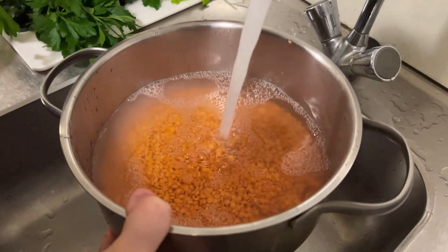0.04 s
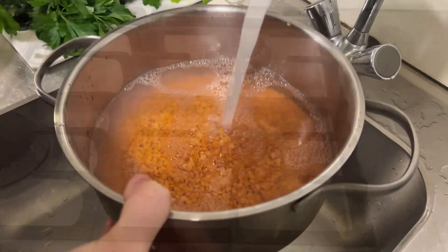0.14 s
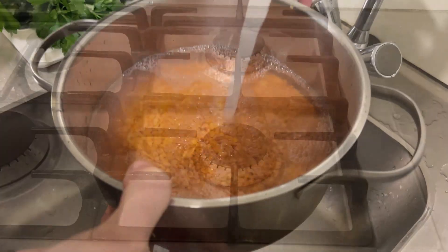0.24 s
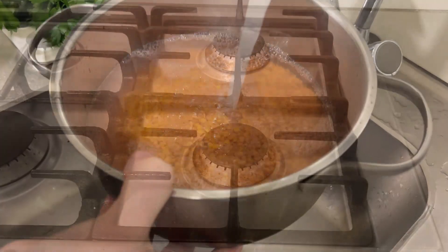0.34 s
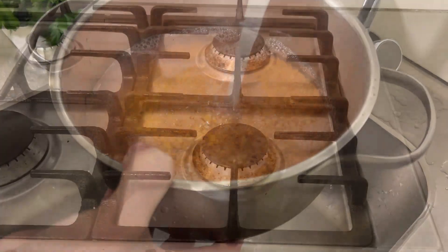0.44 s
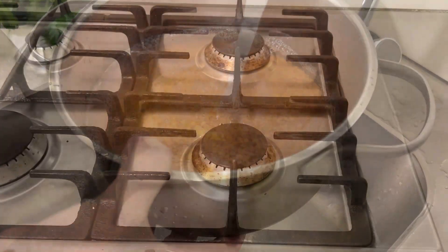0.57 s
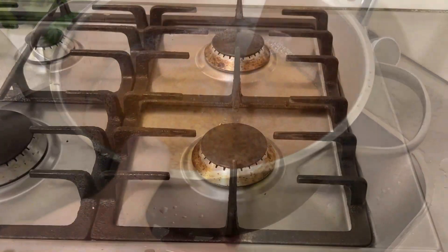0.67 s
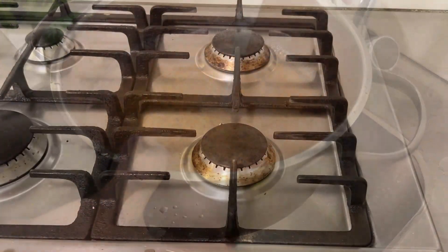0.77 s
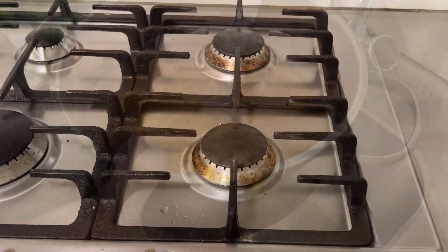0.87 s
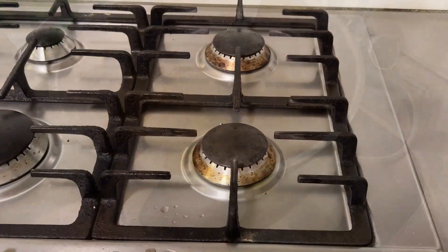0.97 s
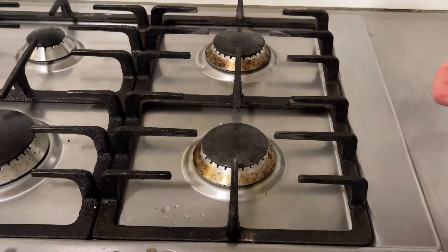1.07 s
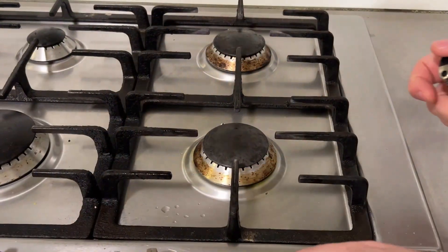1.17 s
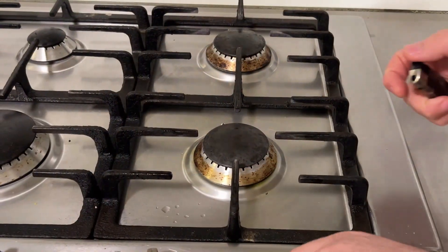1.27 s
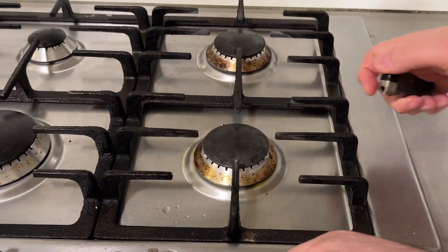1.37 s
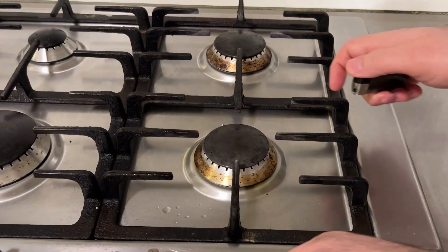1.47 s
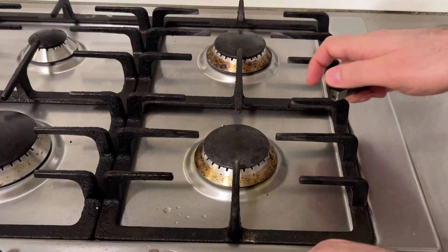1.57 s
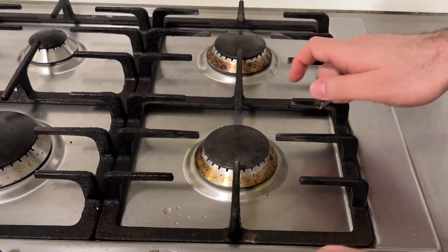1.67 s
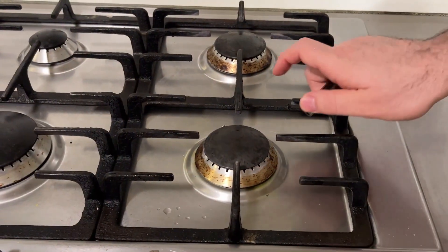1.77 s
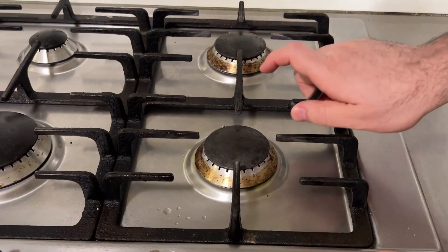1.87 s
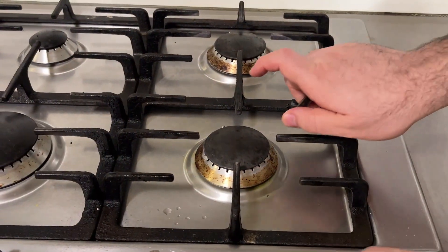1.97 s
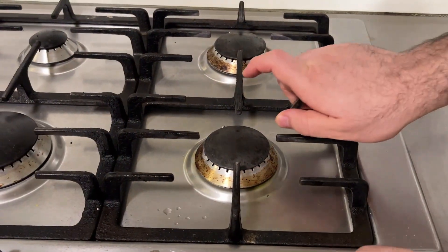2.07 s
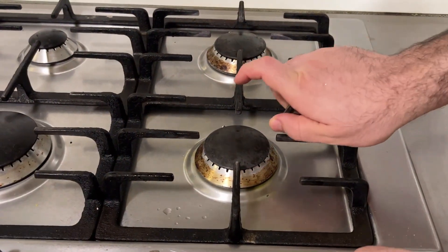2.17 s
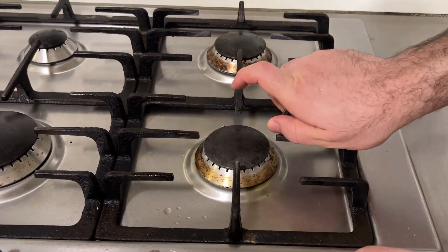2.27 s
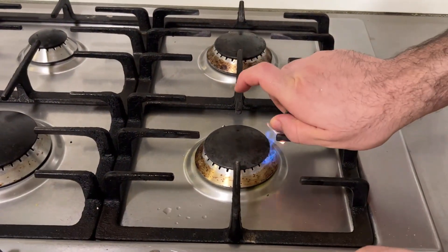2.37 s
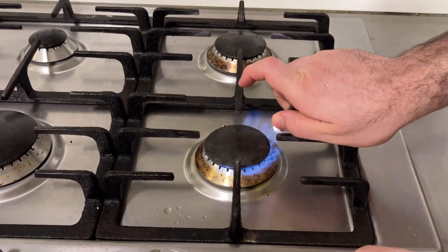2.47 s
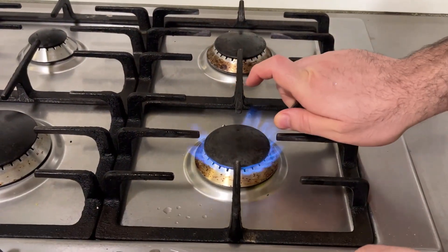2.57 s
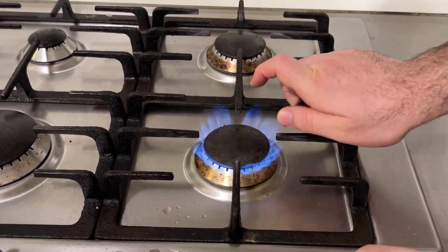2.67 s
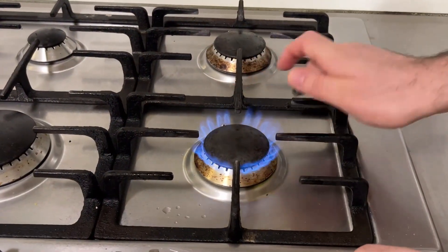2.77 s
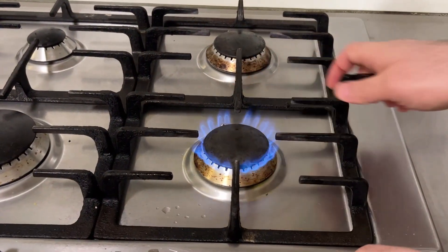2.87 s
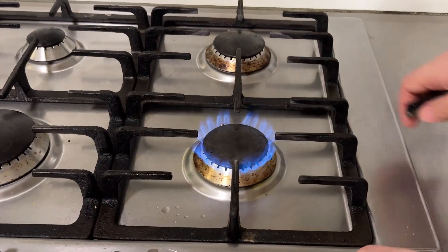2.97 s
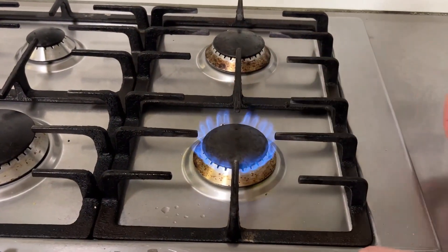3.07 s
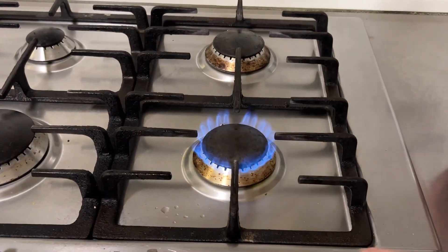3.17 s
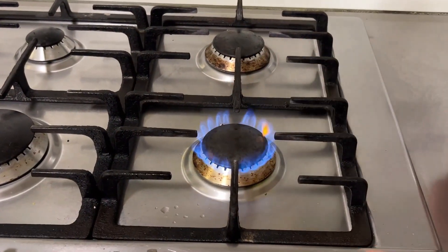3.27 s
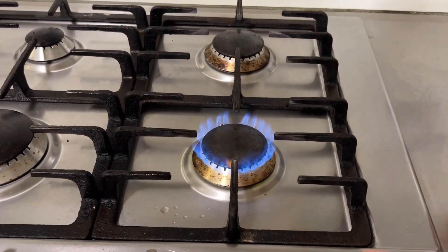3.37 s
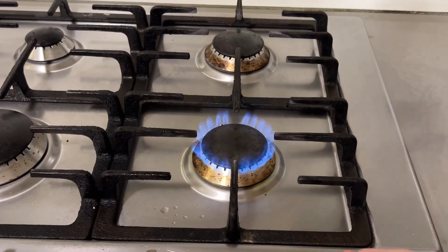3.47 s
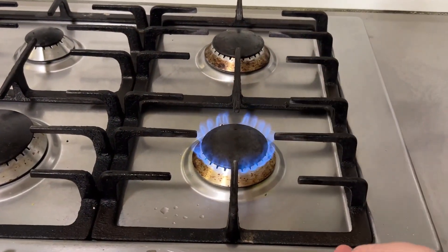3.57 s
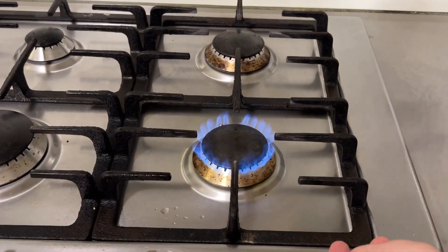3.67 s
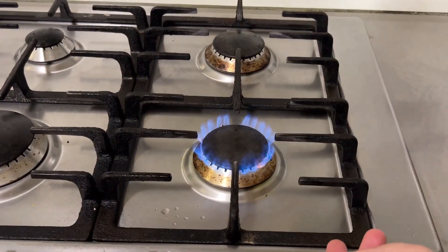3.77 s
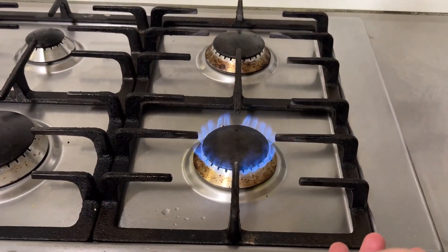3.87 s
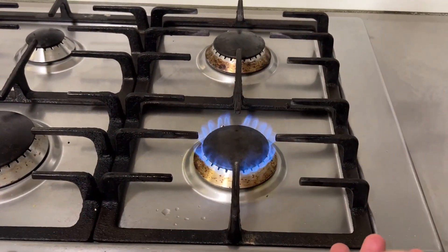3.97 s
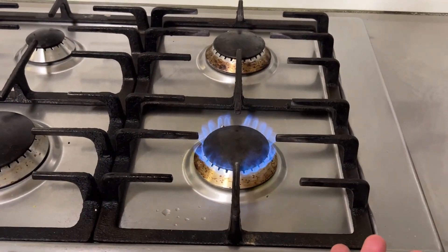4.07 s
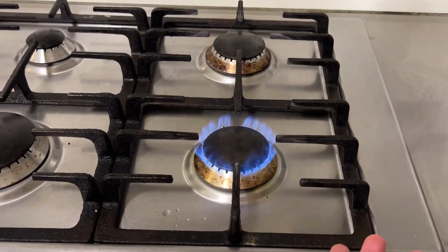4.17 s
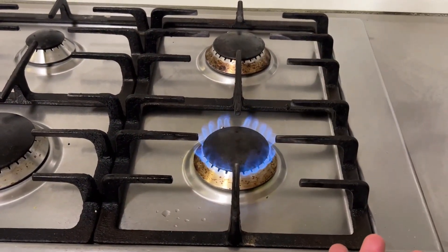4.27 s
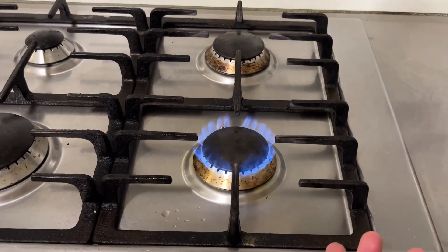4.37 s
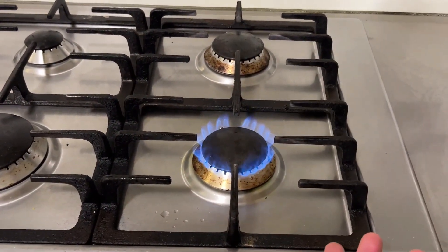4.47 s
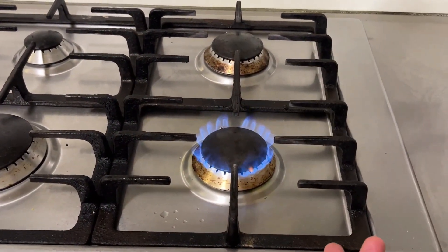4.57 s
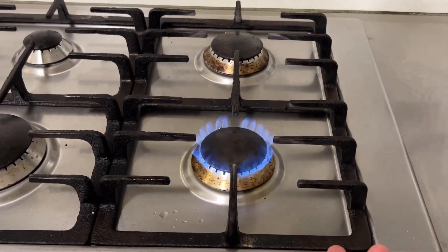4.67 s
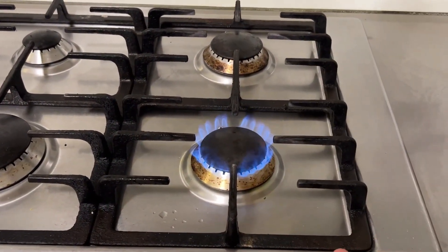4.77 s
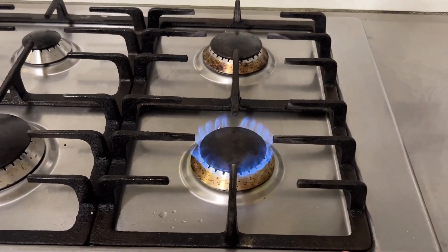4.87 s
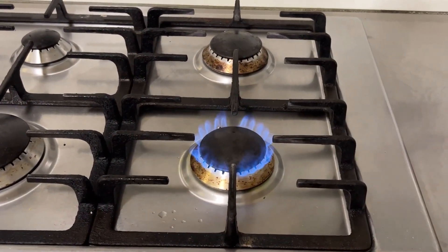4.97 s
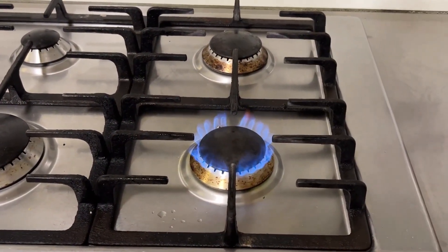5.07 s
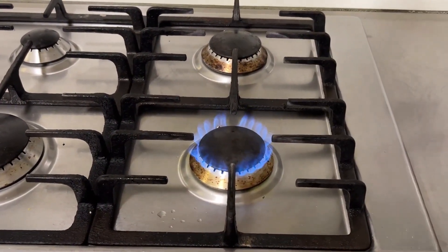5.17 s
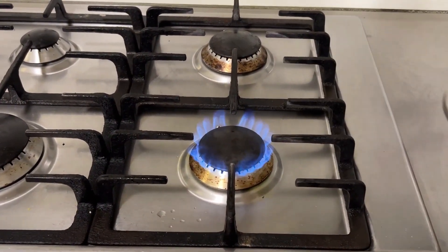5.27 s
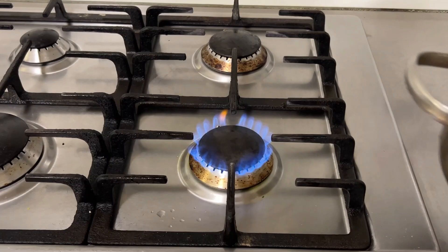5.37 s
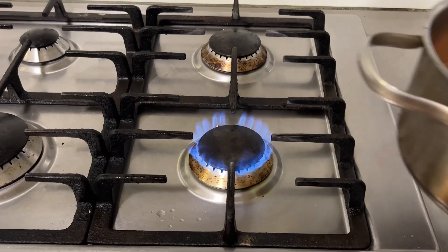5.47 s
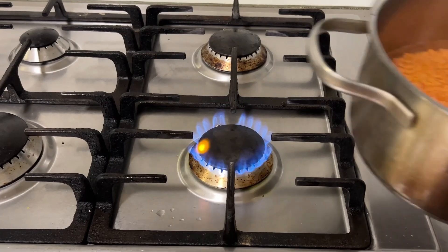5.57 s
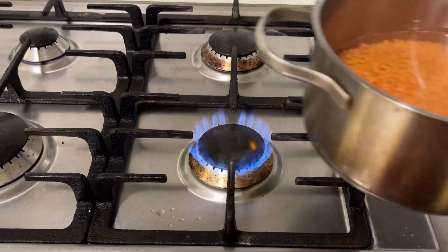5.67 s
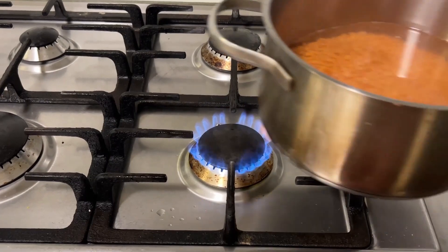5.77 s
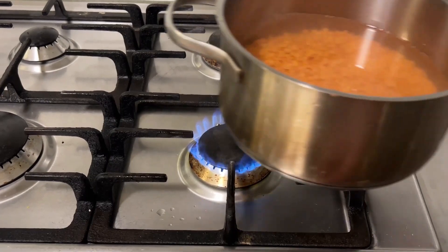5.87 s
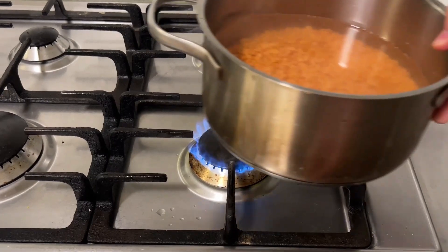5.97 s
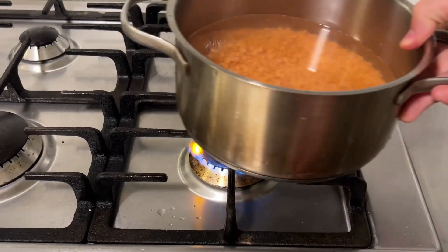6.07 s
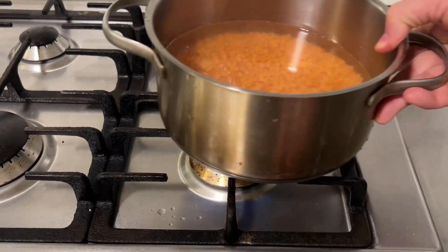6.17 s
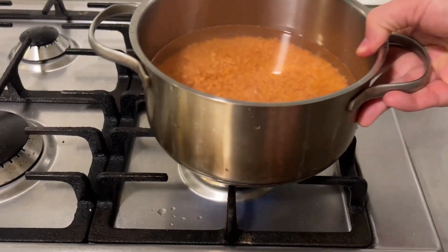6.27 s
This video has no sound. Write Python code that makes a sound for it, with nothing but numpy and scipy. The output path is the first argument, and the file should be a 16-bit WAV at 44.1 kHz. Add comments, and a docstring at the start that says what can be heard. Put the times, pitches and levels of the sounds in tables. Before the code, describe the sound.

A foamy stream of tap water pours into a metal pot from the start, with a broad hiss, fine splashes and a few low gurgles in the first 0.4 seconds; it fades and is gone by 0.9. A cooker hood runs throughout, an airy rush with a low hum and thin wavering tones, rising slightly as the water leaves. At about 1.7 a thin, high gas hiss starts and stays. At 2.2 a lighter snaps, hard and bright, echoing off the kitchen walls, and the flame catches at once with a soft low whoosh, settling by 2.8 into a quiet burn. A faint trigger tick comes near 2.5. At 3.16 the lighter drops on the worktop: high chink, clack, quick bounce, lingering steel ring. Only hiss and hood continue, gently swelling, until a filled steel pot knocks the iron grate at 6.3, short and dull-bright, right before the end.

```python
"""A tap fills a pot with a watery hiss and small gurgles, then fades away under a steady cooker hood.
Gas is opened and hisses as a jet through a tube; a lighter snaps, made of short cracks and ringing metal.
The burner catches with a soft whoosh of low noise, then burns on quietly, and the trigger flicks back.
The lighter is dropped on the worktop, chinks, clacks and sets a steel tray ringing.
At the last moment a steel pot meets the iron grate. The room echoes the knocks; the hood runs throughout."""
import sys
import numpy as np
from scipy import signal
from scipy.fft import rfft, irfft, next_fast_len
from scipy.io import wavfile

SR = 44100
rng = np.random.default_rng(int(sys.argv[2]) if len(sys.argv) > 2 else 0)


def unload_wav(signal):
    """Save mono or channel-first audio to the path in sys.argv[1] as 16-bit WAV at rate SR, clipped to [-1, 1]."""
    wavfile.write(
        sys.argv[1],
        SR,
        np.round(np.clip(np.atleast_2d(signal).T, -1, 1) * 32767).astype(np.int16),
    )


N = 279373
TIME, FREQS = np.arange(N) / SR, np.fft.rfftfreq(N, 1 / SR)

# Gas leaving the injector: (frequency [Hz], level [dB])
GAS_JET = [(300, -100), (1500, -100), (3000, -91.5), (5500, -99), (7500, -107), (10000, -102),
           (11000, -103), (12900, -109), (14000, -104), (16000, -107)]
# Resonances of the burner's mixing tube: (frequency [Hz], width [Hz], lift [dB])
MIXING_TUBE = [(1600, 160, 5), (2310, 130, 8), (3330, 90, 7), (3450, 130, 10), (4300, 500, -3),
               (4980, 220, 10.5), (5430, 170, 6.5), (6500, 190, 11), (8650, 170, 7), (9780, 450, 4),
               (11620, 300, 10), (15060, 300, 15)]
# Slow swelling and ebbing of the hiss: (time [s], level [dB])
HISS_LEVEL = [(1.9, -1.5), (2.9, 1.6), (3.9, -0.5), (4.4, -2), (5.1, 1.6), (5.6, 1), (6.1, -1.2)]
# The flame's soft roar: (frequency [Hz], level [dB])
FLAME_ROAR = [(20, -80), (60, -62.5), (100, -57), (180, -63.5), (400, -78), (1200, -90), (4000, -115)]
# The gas valve opens once and stays open
GAS_ON_S, VALVE_TURN_S, GAS_DB = 1.72, .07, -1.5
# The flame catches, stays full while fire runs round the ring, then dies back to a steady burn
IGNITION_S, CATCH_S, SPREAD_S, SETTLE_S = 2.22, 0.036, 0.33, 0.15
WHOOSH_DB, STEADY_FLAME_DB = -5.5, -20

# In the tables below, t60 is the time a sound takes to die away by 60 dB.
# The lighter's striker, its rebound and the spring's shiver:
# (time [s], crack level [dB], crack t60 [s], ring level [dB])
LIGHTER_SNAPS = [(2.2244, -7, .0045, -25), (2.2258, -14, .008, -38), (2.2287, -26, .02, -43)]
# Tone colour of the snap: (frequency [Hz], level [dB])
SNAP_TONE = [(200, -30), (900, -13), (1200, -6), (1650, 6), (2400, 2), (2950, -1), (3500, 1.5), (4500, 1),
             (5600, -1), (7400, 5), (8300, -1.5), (10400, 10), (12000, 1), (13300, -6), (15000, 8.5),
             (16500, -8)]
# Ringing of the lighter's case and barrel:
# (frequency [Hz], level when snapped [dB], level when dropped [dB], t60 [s])
LIGHTER_BODY = [(1530, -11, -5, .03), (1680, 0, -9, .04), (2260, -3, -8, .035), (2720, -6, 2, .03),
                (3050, -14, -7, .025), (3420, -4, -12, .035), (3900, -7, -3, .03), (4310, -1, -3, .03),
                (4640, -4, -4, .035), (4950, -3, -7, .035), (5880, -7, -7, .025), (6560, -3, -9, .03),
                (7720, -1, -9, .025), (8480, 3, -8, .025)]
# The snap comes back off the hob, the wall behind it and the hood: (delay [s], level [dB])
FIRST_ECHOES = [(.0078, -19), (.0104, -18), (.0127, -19), (.0166, -17)]
# The trigger flicking back: (time [s], crack level [dB], crack t60 [s], ring level [dB])
TRIGGER_RELEASES = [(2.4598, -31.5, .02, -46)]
# Tone colour of the trigger: (frequency [Hz], level [dB])
TRIGGER_TONE = [(500, -18), (2000, -1), (2950, 2), (3800, -5), (4300, 10), (4700, 12), (5700, -3),
                (6800, 3), (9000, -2), (16000, -5)]
# Ringing of the trigger's spring: (frequency [Hz], level [dB], t60 [s])
TRIGGER_SPRING = [(2400, -9, .04), (3250, -9, .04), (4330, -1, .06), (4580, 0, .08), (4720, -3, .09),
                  (4950, -3, .07), (6700, -5, .05)]
# The lighter landing and rattling: (time [s], crack level [dB], crack t60 [s], ring level [dB])
LIGHTER_DROPS = [(3.1587, -19, .008, -42), (3.1614, -5.3, .009, -22), (3.1740, -23.5, .018, -39),
                 (3.1812, -9, .006, -33)]
# Tone colour of the landing: (frequency [Hz], level [dB])
DROP_TONE = [(100, -23), (270, -18), (450, 7), (800, -7), (1500, 3.5), (2200, 2.5), (2800, 1.5),
             (3300, 0.5), (4200, 0), (6000, -2.5), (7300, -0.5), (8500, -0.5), (11000, 3.5), (13000, -3),
             (15000, 0.5), (16500, -19)]
# The lighter's metal tip chinking as it lands: (time [s], crack level [dB], crack t60 [s])
TIP_CHINKS = [(3.1583, -7, 0.013), (3.1610, -16, .008), (3.1740, -28, .012), (3.1811, -21, .008),
              (3.2190, -33, .015), (3.2945, -39, .025)]
# Tone colour of the metal tip: (frequency [Hz], level [dB])
TIP_TONE = [(500, -46), (7000, -33), (9400, -5), (11100, 17), (12300, -13), (16000, -20)]
# Ringing of the worktop and the hob's steel tray: (frequency [Hz], level [dB], t60 [s])
TRAY_MODES = [(343, 1, .5), (390, 0, .4), (465, 6, .08), (540, 4, .35), (1640, -5, .35), (2285, -6, .5),
              (2645, -3, .75), (2741, -1, .7), (3085, -10, .5), (3693, -5, .55), (3876, -7, .4),
              (3935, -5, .35), (4069, -9, .65), (4557, -9, .7), (4644, -9, .65), (4764, -8, .5),
              (5216, -10, .7), (6589, -14, .6), (7074, -10, .5), (8012, -10, .6), (8241, -9, .55),
              (8685, -12, .6)]
TRAY_DB = -39  # added to every level in the table above

# The pot meeting the grate: (time [s], crack level [dB], crack t60 [s], ring level [dB])
POT_CLUNKS = [(6.3283, -12, .03, -14)]
# Tone colour of the pot's knock: (frequency [Hz], level [dB])
POT_TONE = [(100, -17), (700, -9), (1200, -4), (1550, 6.5), (2100, -3), (3400, -13), (4500, -14),
            (7000, -6), (10000, -16), (16000, -24)]
# Ringing of the filled pot's base: (frequency [Hz], level [dB], t60 [s])
POT_BASE = [(1320, -8, .08), (1530, 0, .08), (1700, -3, .08), (2600, -11, .06), (3400, -3, .06),
            (5700, -11, .04)]

# The foamy jet plunging into the pot: (frequency [Hz], level [dB])
WATER_JET = [(30, -80), (160, -56), (300, -76), (800, -64.5), (1200, -63.5), (1350, -71.5), (2200, -72.5),
             (3400, -77.5), (6000, -79), (9000, -79.5), (10400, -75), (12000, -80), (14300, -83),
             (15600, -84)]
# Ringing of the pot and the air above the water: (frequency [Hz], width [Hz], lift [dB])
POT_BOWL = [(780, 50, 3.5), (1100, 5.1, 14), (2320, 120, 6), (3080, 110, 3), (4100, 130, 5), (4300, 160, 1)]
# Air pockets throbbing under the jet: (time [s], level [dB])
AIR_POCKETS = [(.068, -35), (.168, -36), (0.225, -36), (.260, -33), (.335, -42), (.362, -37)]
# The tap holds, fades evenly, and is cut off before the fade is through
TAP_DB, TAP_HOLD_S, TAP_FADE_S = -6.5, 0.12, .93
TAP_STOP_S, TAP_CUT_S = 0.875, .025
# Typical starting pitch of a gurgle, its dying time, and its pitch rise as a share per second
GURGLE_HZ, GURGLE_T60_S, GURGLE_RISE_PER_S = 140, 0.11, 2.5

# Air rushing through the hood: (frequency [Hz], level [dB])
HOOD_RUSH = [(20, -93), (55, -72.5), (85, -70.5), (125, -65.5), (170, -66.5), (300, -68.5), (600, -70),
             (1240, -72), (1340, -76.5), (2100, -81.5), (3100, -88), (4200, -92.5), (7000, -100),
             (11500, -120), (16000, -140)]
# Resonances of the hood's casing and duct: (frequency [Hz], width [Hz], lift [dB])
HOOD_DUCT = [(123, 18, 5.5), (275, 45, 4), (360, 16, -4), (441, 32, 4), (815, 40, 1.5), (890, 40, -2.5),
             (1025, 50, 3.5), (1120, 30, -3), (1200, 45, 3.5), (1228, 6, 3), (1420, 70, -2), (1510, 60, 4),
             (1690, 90, 2.8), (1870, 100, -2), (2305, 80, 4), (3000, 70, 2), (3680, 120, 2)]
# Tones of the hood's motor and fan blades: (frequency [Hz], level [dB], left minus right [dB],
# loudest time [s], drop far from that time [dB])
HOOD_TONES = [(100, -57, 0, 4.5, 3), (122, -54, 0, 4.8, 2), (200, -52.5, -5, 2.8, 2), (339, -60.5, 0, 3, 0),
              (865, -54.5, 0, 1.7, 8), (1091, -51.5, 2, 3.9, 11), (1099, -53, 2, 1, 12),
              (1143.5, -52, 0, 4.2, 5), (1150, -50.5, 0, 2.3, 17), (1228, -52.5, 2, 5.7, 9)]
HUM_SWELL_S = 1.33  # how slowly each tone swells and ebbs
# The fan's speed drifts by this share, and each tone's level sways in the moving air
FAN_DRIFT, HUM_SWAY_DB = .0004, 1
# The hood is fainter at first, then comes up to full strength
HOOD_START_DB, HOOD_RISE_AT_S, HOOD_RISE_S = -4.5, 0.59, 0.42

# Scatter off nearby surfaces, with little of the highest treble: (frequency [Hz], level [dB])
NEARBY_SURFACES = [(200, 13), (2000, 9.5), (7000, 15), (10000, -3), (15000, -23)]
# The kitchen's echo: (frequency [Hz], t60 [s], level against the direct sound [dB])
KITCHEN_ECHO = [(200, 0.75, 3), (1500, 0.89, -1.5), (3920, 0.98, 1.5), (7100, 0.8, 0.5), (8150, 0.69, -1),
                (9200, 0.68, -3.5), (11400, 0.58, -6.5), (14500, 0.52, -14)]
# How alike noise is on both sides: (frequency [Hz], likeness [1 = the same, 0 = unrelated])
SIDE_LIKENESS = [(30, 1), (70, 1), (150, 0.95), (300, 0.83), (640, 0.1), (1400, 0.26), (1800, -0.22),
                 (2400, 0.016), (8000, 0.046)]
# Balance of the two sides: (frequency [Hz], left minus right [dB])
SIDE_BALANCE = [(100, 0.5), (350, -1.5), (700, 1), (1600, 2.5), (2300, -2), (3500, 2.5), (4300, 4),
                (5200, 10.5), (6500, 9), (7500, 7), (8300, 2.5)]
# How far the left lags in the shared treble: (frequency [Hz], lag [turns])
LEFT_LAG = [(8300, 0), (10150, .5), (12100, 1), (13850, 1.5), (15400, 2)]
# The upper frequency limit, and the amplitude at which peaks are rounded off
EDGE_HZ, CEILING = 16100, .58


def amp(db):
    """Turns decibels into a gain."""
    return 10 ** (np.asarray(db) / 20)


def read(points, hz, axis=1):
    """Reads a column of a table, joined by straight lines over log frequency."""
    table = np.transpose(points)
    return np.interp(np.log(hz + 1), np.log(table[0] + 1), table[axis])


def ramp(start_s, length_s):
    """Rises evenly from 0 to 1, then stays there."""
    return np.clip((TIME - start_s) / length_s, 0, 1)


def add(mix, s, sound):
    """Lays a stereo sound into the mix at time s, cutting off what runs past the end."""
    part = mix[:, round(s * SR):][:, :sound.shape[1]]
    part += sound[:, :part.shape[1]]


def peaks(modes, hz):
    """Gives the lift or dip in dB that a set of resonances makes."""
    power = sum((amp(db) ** 2 - 1) / (1 + (2 * (hz - f) / width) ** 2) for f, width, db in modes)
    return 10 * np.log10(1 + power.clip(-.9))


def rush(spectrum, modes=()):
    """Turbulent noise on both sides: swirling air or water, mostly alike in the bass."""
    size = next_fast_len(N)
    hz = np.fft.rfftfreq(size, 1 / SR)
    left, other = rfft(rng.standard_normal((2, size)))
    same = np.clip(read(SIDE_LIKENESS, hz), -1, 1)
    right = same * left + np.sqrt(1 - same ** 2) * other
    db = read(spectrum, hz) + (peaks(modes, hz) if modes else 0)
    return irfft(np.array([left, right]) * amp(db), size)[:, :N] * np.sqrt(SR / 2)


def wander(rate_hz):
    """A slow random curve with a typical size of 1, moving mostly below the given rate."""
    slow = irfft(rfft(rng.standard_normal(N)) / (1 + (FREQS / rate_hz) ** 4), N)
    return slow / slow.std()


def flutter(rate_hz, depth_db):
    """A gain that wanders at random."""
    return amp(depth_db * wander(rate_hz))


def tint(x, colour, size=2048):
    """Colours a sound with a filter of unit energy that never answers ahead of its input."""
    log_gain = np.log(amp(read(colour, abs(np.fft.fftfreq(size, 1 / SR)))))
    taps = np.fft.ifft(np.exp(np.conj(signal.hilbert(log_gain)))).real
    return signal.fftconvolve(x, taps[None] / np.linalg.norm(taps), axes=1)


def knock(db, t60, colour, scatter_db=-20, scatter_t60=0.14, size=8192):
    """A hard contact: a dense, dying crack plus a duller scatter off the nearby steel."""
    t = np.arange(size) / SR
    crack = rng.choice([-1, 1], (2, size)) * amp(-60 * t / t60)
    scatter = tint(rng.standard_normal((2, size)), NEARBY_SURFACES)[:, :size]
    scatter *= amp(scatter_db - 60 * t / scatter_t60)
    return amp(db) * tint(crack + scatter, colour)


def ring(modes):
    """Dying tones of a struck body; higher tones can differ more in phase between the sides."""
    out = np.zeros((2, SR))
    lags = rng.uniform(-1, 1, (len(modes), 2, 1)) * 3 / SR  # up to three samples either way
    for (hz, db, t60), lag in zip(modes, lags):
        t = TIME[:round(t60 * SR)]
        add(out, 0, amp(db - 60 * t / t60) * np.sin(2 * np.pi * hz * (t + lag)))
    return out


def blows(rows, colour, modes):
    """All the contacts of one object: each cracks and rings the body."""
    out = np.zeros((2, N))
    for s, db, t60, ring_db in rows:
        add(out, s, knock(db, t60, colour))
        add(out, s, amp(ring_db) * ring(modes))
    return out


def burner():
    """Gas hisses through the mixing tube; once lit, the flame flares, settles and flutters."""
    hiss_db = np.interp(TIME, *np.transpose(HISS_LEVEL))
    flow = amp(GAS_DB) * ramp(GAS_ON_S, VALVE_TURN_S) * amp(hiss_db)
    flare = np.exp(-np.maximum(TIME - IGNITION_S - SPREAD_S, 0) / SETTLE_S)
    fire = ramp(IGNITION_S, CATCH_S) * (amp(WHOOSH_DB) * flare + amp(STEADY_FLAME_DB))
    flame = rush(FLAME_ROAR) * fire * flutter(14, depth_db=1)
    return rush(GAS_JET, MIXING_TUBE) * flow + flame


def lighter_clicks():
    """The striker's blows ring the lighter's body; the returning trigger rings its spring."""
    snapped = [(hz, db, t60) for hz, db, _, t60 in LIGHTER_BODY]
    snaps = blows(LIGHTER_SNAPS, SNAP_TONE, snapped)
    return snaps + blows(TRIGGER_RELEASES, TRIGGER_TONE, TRIGGER_SPRING)


def over_hob(clicks):
    """Adds the clicks' first reflections, which thicken the moment after the snap."""
    out = clicks.copy()
    for delay_s, db in FIRST_ECHOES:
        add(out, delay_s, amp(db) * clicks)
    return out


def lighter_drop():
    """The lighter's body clacks and bounces on the worktop, ringing at each contact."""
    dropped = [(hz, db, t60) for hz, _, db, t60 in LIGHTER_BODY]
    return blows(LIGHTER_DROPS, DROP_TONE, dropped)


def chinks(tip_scatter_db=-33):
    """The metal tip meets the worktop first: a chink too thin and high to stir the room."""
    out = np.zeros((2, N))
    for s, db, t60 in TIP_CHINKS:
        add(out, s, knock(db, t60, TIP_TONE, scatter_db=tip_scatter_db))
    return out


def tray():
    """The lighter's hardest blow sets the worktop and the steel tray ringing."""
    out = np.zeros((2, N))
    hardest = max(LIGHTER_DROPS, key=lambda row: row[1])
    add(out, hardest[0], amp(TRAY_DB) * ring(TRAY_MODES))
    return out


def pot_on_grate():
    """Steel meets iron: a crack, and the ringing base of the filled pot."""
    return blows(POT_CLUNKS, POT_TONE, POT_BASE)


def tap(bubbles_per_s=900, bubble_db=-58, splashes_per_s=110, splash_db=-50):
    """The hiss of the jet, with small splashes and tiny bubbles bursting in the foam."""
    pops = (rng.random((2, N)) < bubbles_per_s / SR) * rng.standard_normal((2, N))
    fizz = tint(pops, [(500, -35), (2500, -25), (11000, 27), (16000, -11)])[:, :N]  # (Hz, dB)
    drops = (rng.random((2, N)) < splashes_per_s / SR) * rng.uniform(-1, 1, (2, N))
    # Each drop takes one of 16 pitches and makes a short blip
    pitch, t = rng.integers(0, 16, (2, N)), TIME[:1024]
    splash = np.zeros((2, N))
    for k, hz in enumerate(np.geomspace(600, 4500, 16)):
        blip = np.sin(2 * np.pi * hz * t) * hz ** .5 * t * np.exp(-hz * t / 2)
        splash += signal.oaconvolve(drops * (pitch == k), [blip], axes=1)[:, :N]
    water = rush(WATER_JET, POT_BOWL)
    water += amp(bubble_db) * fizz / fizz.std() + amp(splash_db) * splash / splash.std()
    fade = (1 - ramp(TAP_HOLD_S, TAP_FADE_S)) * (1 - ramp(TAP_STOP_S, TAP_CUT_S))
    return water * amp(TAP_DB) * fade


def gurgles(swell_s=0.0053):
    """Air pockets dragged under by the jet: each throbs briefly, rising in pitch as it surfaces."""
    out, t = np.zeros((2, N)), TIME[:SR // 5]
    for s, db in AIR_POCKETS:
        hz = GURGLE_HZ * rng.uniform(.85, 1.15) * (1 + GURGLE_RISE_PER_S * t)
        level = (1 - np.exp(-t / swell_s)) * amp(db - 60 * t / GURGLE_T60_S)
        throb = np.sin(2 * np.pi * np.cumsum(hz) / SR) * level
        add(out, s, np.array([throb, throb]))
    return out


def hum():
    """Thin tones that follow the fan's speed; where noise is less alike, they are further out of step."""
    speed = 1 + FAN_DRIFT * wander(2.03)
    clock, out = np.cumsum(speed) / SR, np.zeros((2, N))
    side = np.array([[.5], [-.5]])  # left, right
    for hz, db, lean_db, loudest_s, fainter_db in HOOD_TONES:
        away = 1 - np.exp(-((TIME - loudest_s) / HUM_SWELL_S) ** 2)
        apart = np.arccos(np.clip(read(SIDE_LIKENESS, hz), -1, 1))
        tone = np.sqrt(2) * np.sin(2 * np.pi * (hz * clock + rng.random()) + side * apart)
        level = amp(db + side * lean_db - fainter_db * away)
        out += level * tone * flutter(1.8, depth_db=HUM_SWAY_DB)
    return out


def hood():
    """The extractor fan pushes air through its duct, giving a rush and a hum."""
    level = amp(HOOD_START_DB * (1 - ramp(HOOD_RISE_AT_S, HOOD_RISE_S)))
    return (rush(HOOD_RUSH, HOOD_DUCT) + hum()) * level


def kitchen(x, build_s=0.022):
    """Dense reflections off hard walls, each band dying at its own speed."""
    hz, t, noise = signal.stft(rng.standard_normal((2, SR)), SR, nperseg=256)
    t60 = read(KITCHEN_ECHO, hz)[:, None]
    decay = amp(read(KITCHEN_ECHO, hz, axis=2)[:, None] - 60 * t / t60)
    gain = decay * np.sqrt(2 * np.log(1000) / (t60 * SR))  # evens out long and short echoes
    tail = signal.istft(noise * gain, SR, nperseg=256)[1][:, :SR]
    tail *= 1 - np.exp(-TIME[:SR] / build_s)
    return signal.fftconvolve(x, tail, axes=1)[:, :N]


def echoes(snap_echo_db=-4, drop_echo_db=-1.0, pot_echo_db=-3, count=3):
    """A knock sounds a little different towards each wall, so the walls return a smooth wash."""
    out = np.zeros((2, N))
    for wall in range(count):
        sent = amp(snap_echo_db) * lighter_clicks()
        sent += amp(drop_echo_db) * lighter_drop()
        sent += amp(pot_echo_db) * pot_on_grate()
        out += kitchen(sent)
    return out / np.sqrt(count)


def scene():
    """Adds the burner, the close knocks, the water, the hood and the room's echoes."""
    lighter = over_hob(lighter_clicks()) + lighter_drop() + chinks() + tray()
    water = tap() + gurgles()
    return burner() + lighter + pot_on_grate() + water + hood() + echoes()


def record(dry, split_hz=8200, crossover_hz=800):
    """Balances the sides, shares one treble with the left a little late, and rounds off peaks."""
    left, right = rfft(dry) * amp(np.outer([.5, -.5], read(SIDE_BALANCE, FREQS)))
    # Above the split, the right side takes over the left's treble
    blend = np.pi / 2 * np.clip((FREQS - split_hz) / crossover_hz + .5, 0, 1)
    lag = np.exp(2j * np.pi * np.interp(FREQS, *np.transpose(LEFT_LAG)))
    right = np.cos(blend) * right + np.sin(blend) * lag * left
    pair = irfft(np.array([left, right]), N)
    pair = CEILING * np.tanh(pair / CEILING)
    low_pass = signal.firwin(255, EDGE_HZ, window=("kaiser", 9), fs=SR)
    return signal.oaconvolve(pair, low_pass[None], "same")


dry = scene()
out = record(dry)
unload_wav(out)
```